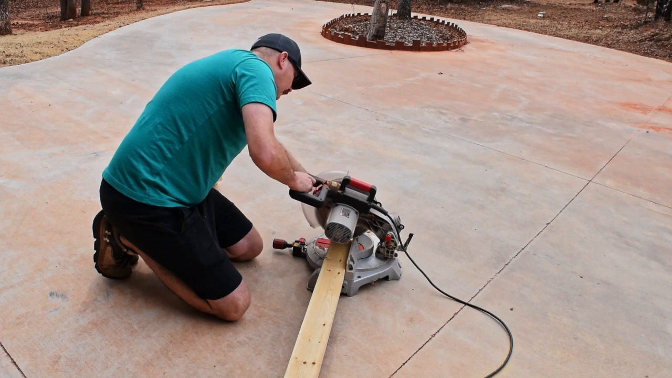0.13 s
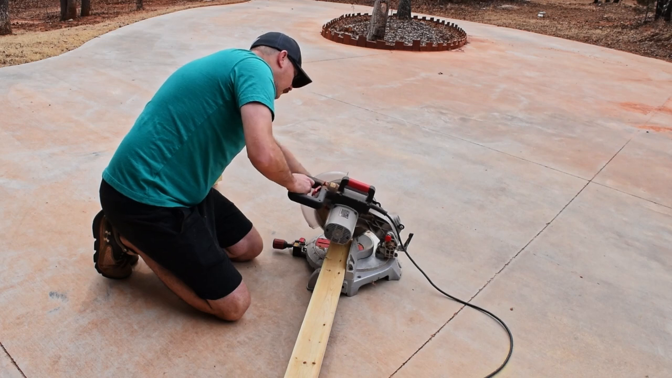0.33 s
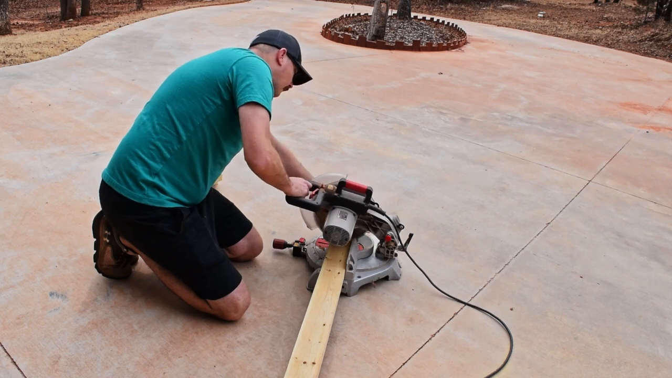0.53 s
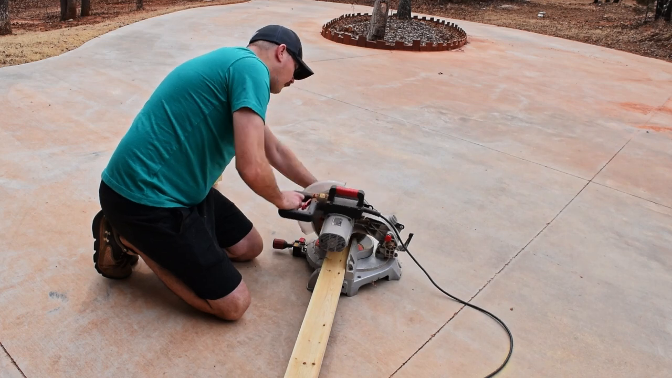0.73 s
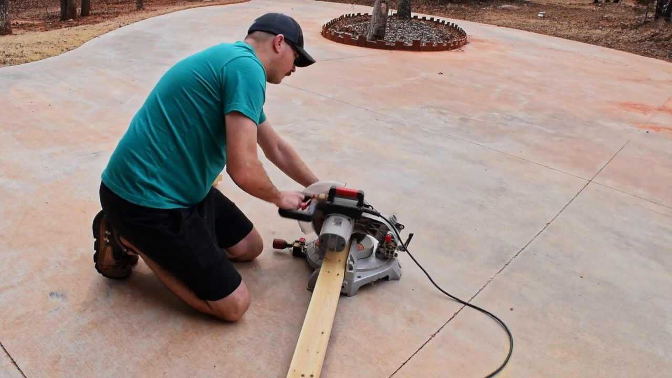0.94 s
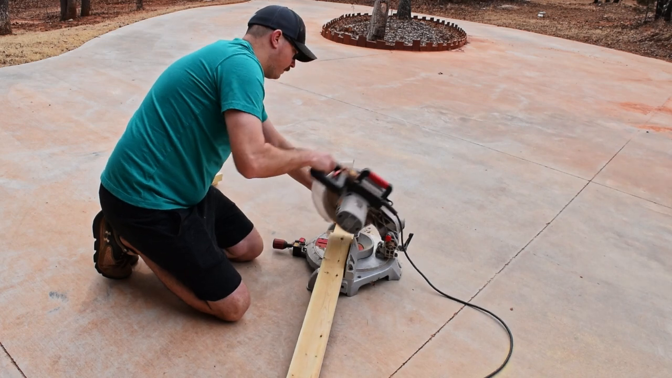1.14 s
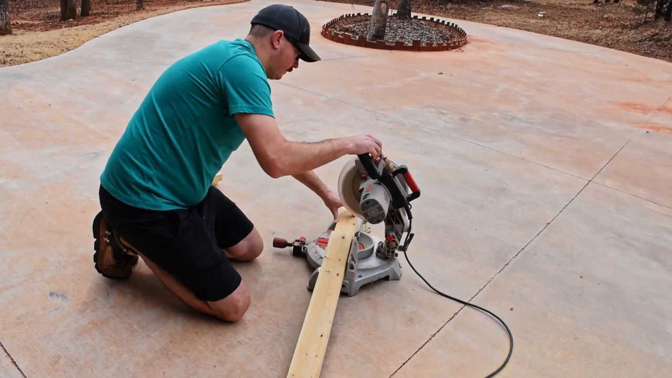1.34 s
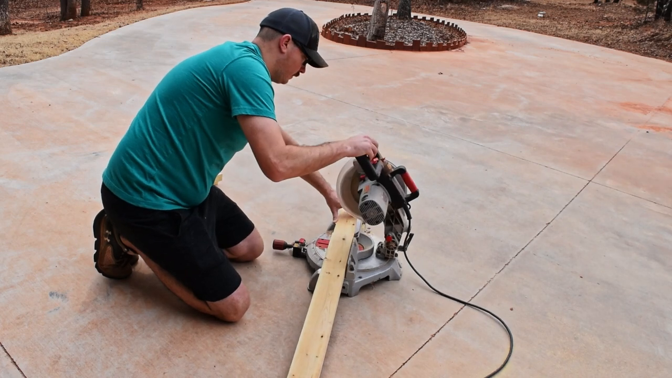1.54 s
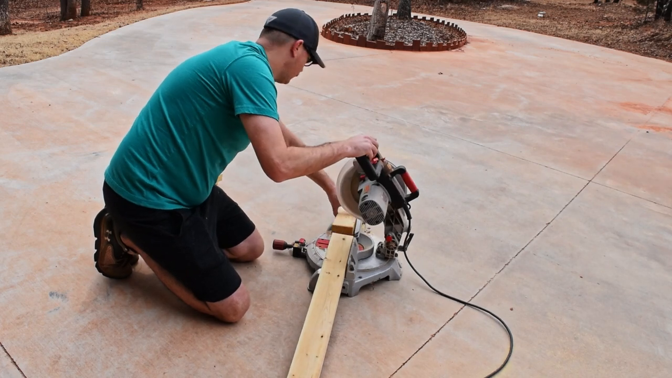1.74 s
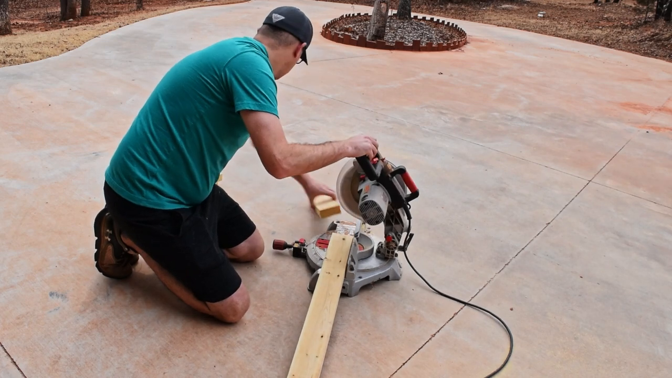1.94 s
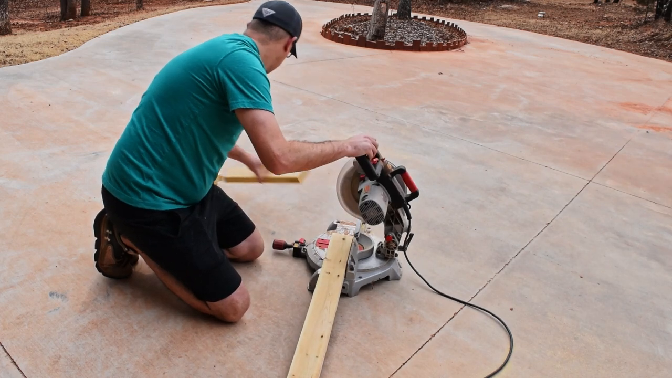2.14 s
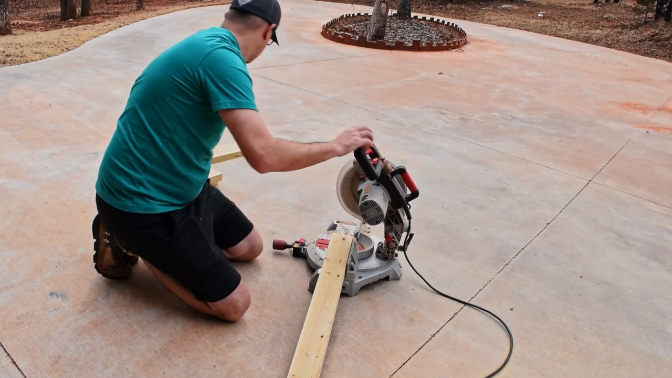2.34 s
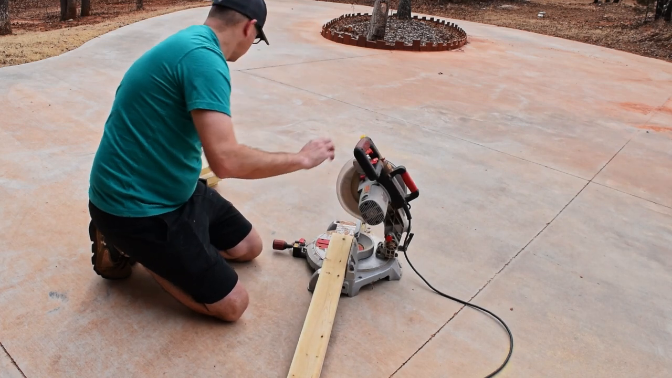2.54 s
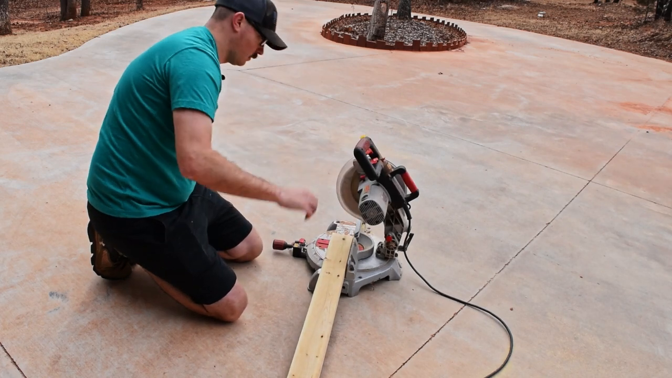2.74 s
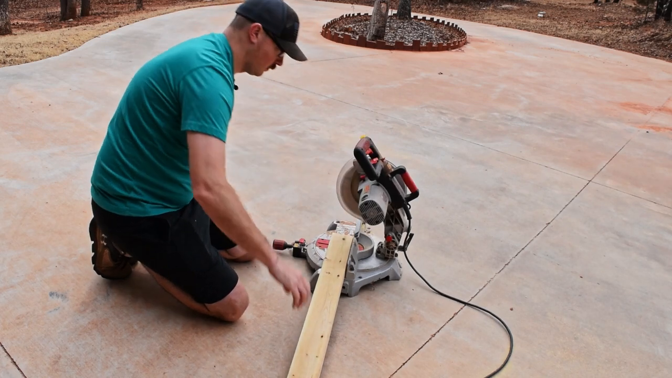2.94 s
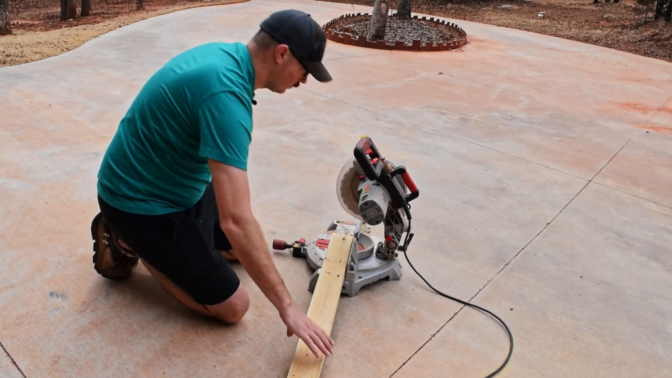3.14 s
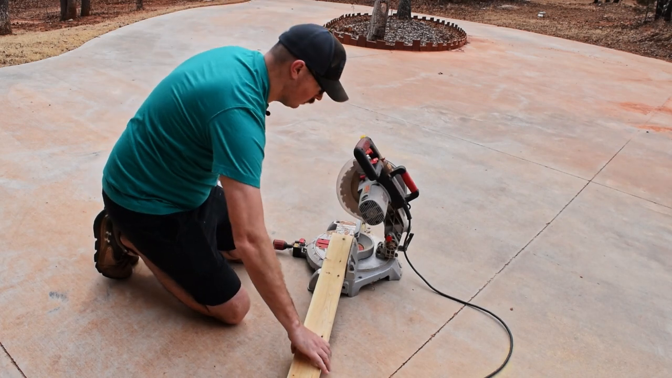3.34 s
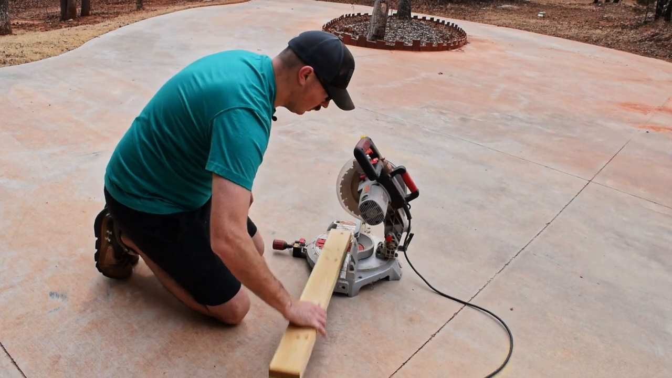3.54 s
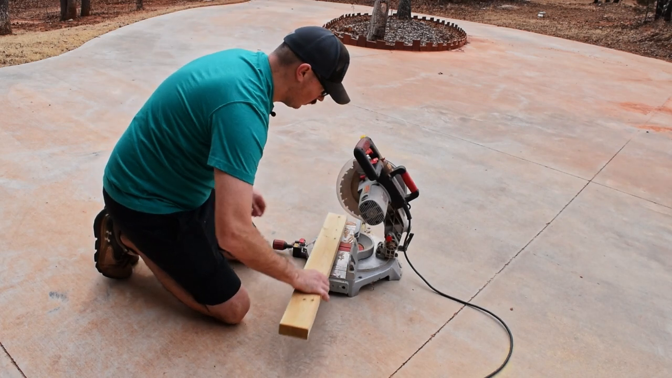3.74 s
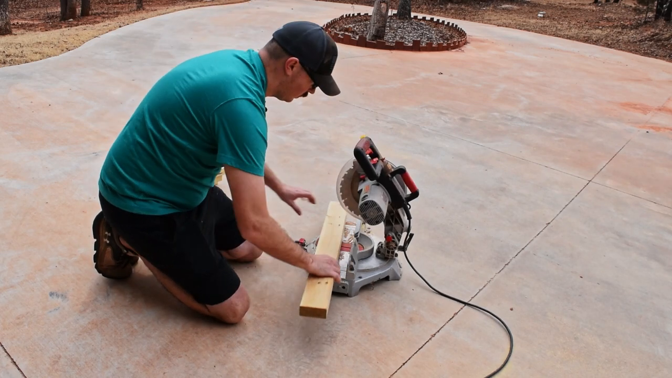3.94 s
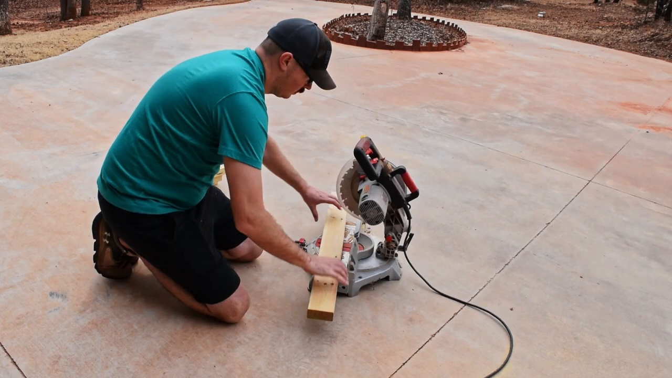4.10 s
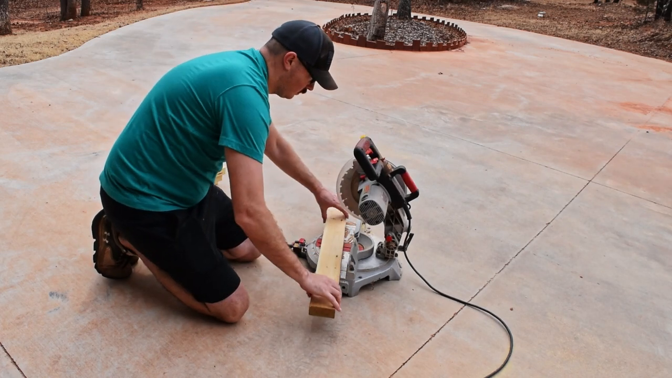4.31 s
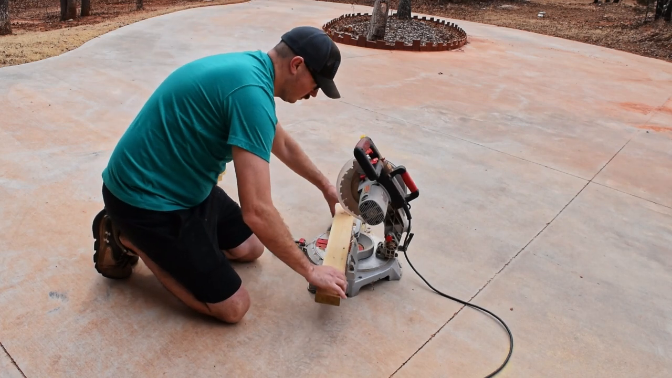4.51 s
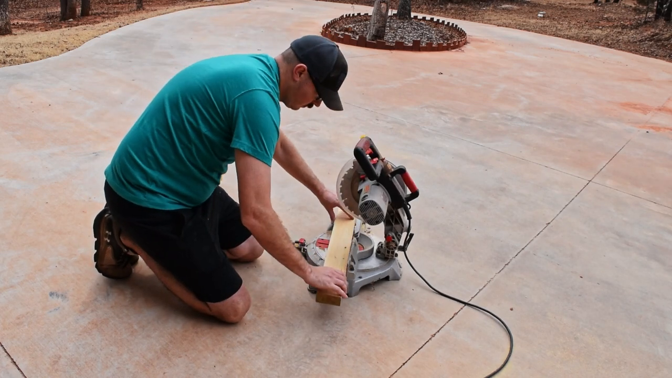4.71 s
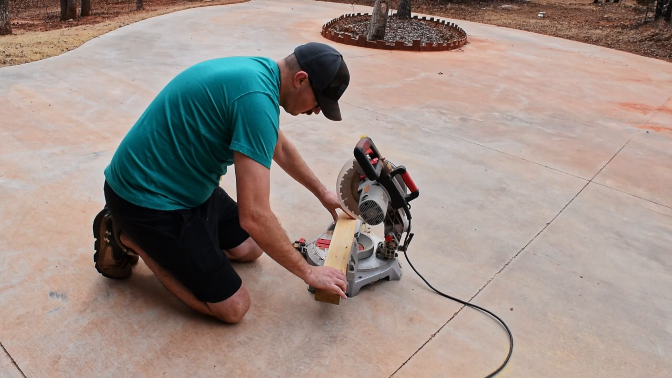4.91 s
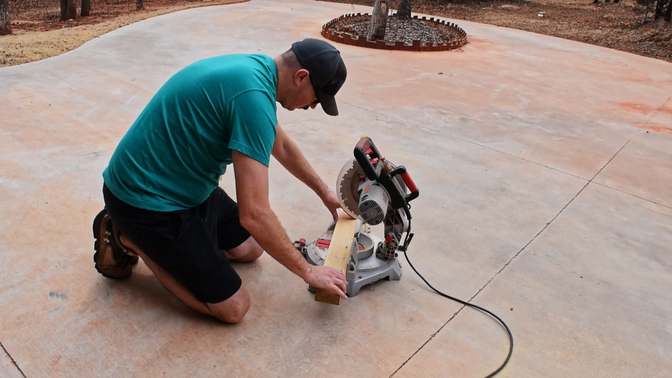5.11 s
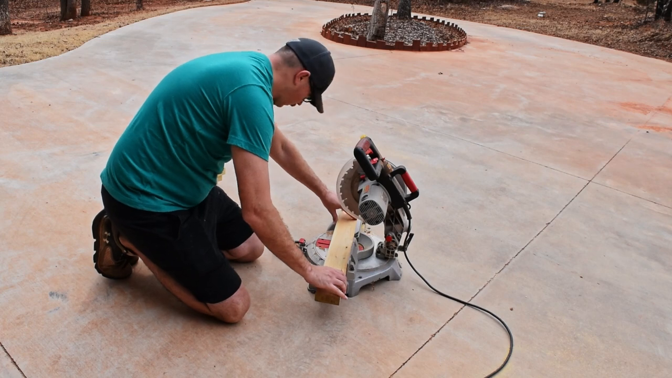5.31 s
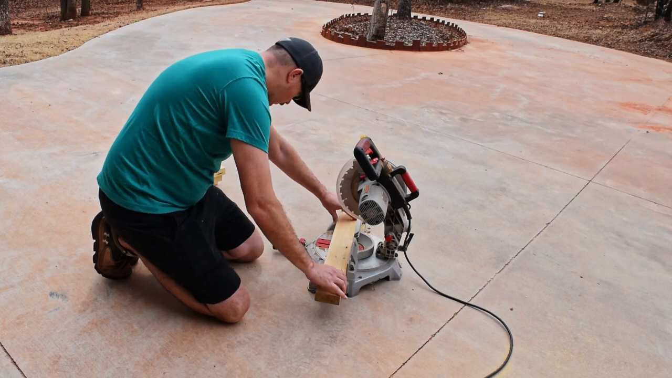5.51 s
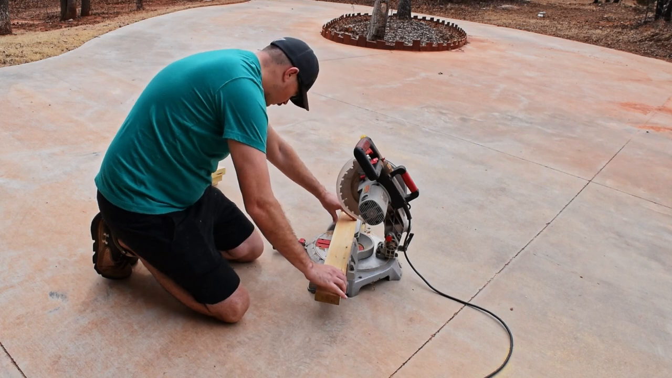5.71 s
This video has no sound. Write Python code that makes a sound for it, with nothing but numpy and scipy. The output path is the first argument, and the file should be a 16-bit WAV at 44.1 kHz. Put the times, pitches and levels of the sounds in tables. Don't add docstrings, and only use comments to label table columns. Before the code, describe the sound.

Close and fairly dry outdoors: a saw blade rips through wood under load, suddenly eases off, then slows in a descending whine while the raised head rattles. After a small wooden tap on the ground, only handling remains: scraping, a cluster of plank knocks, light nudges and faint rustle over low wind, cutting off abruptly near the end.

```python
import sys
import numpy as np
from scipy import signal
from scipy.fft import rfft, irfft, next_fast_len
from scipy.io import wavfile
from scipy.ndimage import uniform_filter1d, minimum_filter1d

SR = 44100
rng = np.random.default_rng(int(sys.argv[2]) if len(sys.argv) > 2 else 0)


def unload_audio(sound):
    columns = np.transpose(np.atleast_2d(sound))
    steps = np.round(np.clip(columns, -1, 1) * 32767)
    wavfile.write(sys.argv[1], SR, steps.astype(np.int16))


def invert_db(x):
    u = np.asarray(x, float) / 20
    return 10 ** u


N = 253948
TIME = np.arange(N) / SR

# frequency in Hz, level in dB, ring time t60 in seconds.
PLANK_MODES = [(262.3, -23.5, 0.12), (367, -3, 0.095), (431.5, -11.5, 0.15), (579.3, -8.5, 0.16),
               (635, 0, 0.038), (748.5, -3.5, 0.054), (1041, -13.5, 0.093), (1302, -19, 0.086),
               (1637, -17, 0.055)]

HANDOVER_S = 2.86
FREED = np.clip((TIME - .782) / 0.041, 0, 1)
OPENED = np.interp(TIME, [0.93, 1.46], [0, 1])
BRAKED_S = np.clip(TIME - .95, 0, None)

FREE_HZ, CREEP_HZ, SLOWS_PER_S = 4900, 295, 2.41
MOTOR_HZ = CREEP_HZ + (FREE_HZ - CREEP_HZ) * np.exp(-SLOWS_PER_S * BRAKED_S)
SPEED_DB = 20 * np.log10(MOTOR_HZ / FREE_HZ)


def unit(x):
    return x / np.sqrt(np.mean(x ** 2) + 1e-20)


def along(points, hz):
    f, v = np.transpose(points)
    return np.interp(np.log(hz + 1), np.log(f + 1), v)


def curves(rows):
    s, *cols = np.transpose(rows)
    return [np.interp(TIME, s, c) for c in cols]


def swells(rows, rise, fall, base_db):
    power = invert_db(2 * base_db)
    for s, db in rows:
        drop_db = np.where(TIME < s, rise * (s - TIME), fall * (TIME - s))
        power = power + invert_db(2 * (db - drop_db))
    return 10 * np.log10(power)


def arch(start, end):
    return np.sqrt(np.clip(1 - ((2 * TIME - start - end) / (end - start)) ** 2, 0, 1))


def wobble(rate):
    knots = rng.standard_normal(int(N * rate / SR) + 4)
    return 1.2 * np.interp(TIME * rate, np.arange(len(knots)), knots)


def filtered(x, response):
    m = next_fast_len(N + SR // 2)
    return irfft(rfft(x, m) * response(np.fft.rfftfreq(m, 1 / SR)), m)[..., :N]


def peaks(modes, f):
    total = 0
    for k, (centre, width, db) in enumerate(modes):
        resonance = 1j * f * width / (centre * centre - f * f + 1j * f * width)
        total = total + (-1) ** k * invert_db(db) * resonance
    return total


def grit(spiky_db, rate):
    return rng.standard_normal(N) * invert_db(spiky_db * wobble(rate))


def patches(patchy_db):
    z = signal.stft(rng.standard_normal(N), nperseg=512)[2]
    field = uniform_filter1d(rng.standard_normal(z.shape), size=12, axis=0)
    field = uniform_filter1d(field, size=10, axis=1)
    return signal.istft(z * invert_db(patchy_db * unit(field)), nperseg=512)[1][:N]


def whine(hz, smear):
    turn = 2 * np.pi * np.cumsum(hz * (1 + smear * wobble(900))) / SR
    return np.sqrt(2) * np.sin(turn) * invert_db(1.8 * wobble(25) - .4) * (hz < SR / 2)


def band(hz, width_hz):
    turn = 2 * np.pi * np.cumsum(hz) / SR
    return (wobble(width_hz) * np.sin(turn) + wobble(width_hz) * np.cos(turn)) * (hz < SR / 2)


def nearness(hz, best, reach):
    return np.exp(-(np.log2(hz / best) / reach) ** 2 / 2)


def saw():
    noise = housing_growl() + fan_air() + tooth_hiss()
    noise = filtered(noise, lambda f: invert_db(along([(100, -6), (200, 0)], f)))
    return (TIME < HANDOVER_S) * (noise + filtered(tooth_tones() + motor_tones(), blade))


def running_db(cut_db, per_bite_db, free_db, per_speed_db, fade_db_per_s, lift_db, lift):
    # time in seconds, feed pressure in dB.
    bite = [
        (0, -4.5),
        (.08, -1),
        (.3, -0.36),
        (.53, 0.7),
        (.67, 2.5),
        (.76, -1.5),
        (.8, -3.5),
    ]
    cutting = cut_db + per_bite_db * curves(bite)[0]
    spinning = free_db + per_speed_db * SPEED_DB - fade_db_per_s * BRAKED_S + lift_db * lift
    return (1 - FREED) * cutting + FREED * spinning


def blade(f):
    # frequency in Hz, width in Hz, level in dB over the hiss.
    plate_modes = [(4400, 160, -3.5), (4900, 26, 4), (5470, 7.6, 6.5), (6650, 62, 3), (7800, 30, 8),
                   (8550, 61, 9.5), (8900, 30, 5), (9500, 42, 8), (10430, 20, 5), (10000, 17, 3),
                   (10260, 12, 5.5), (11000, 30, -4.5), (12770, 27, 5), (13400, 30, -0.5)]
    return np.sqrt(1 + abs(peaks(plate_modes, f)) ** 2)


def housing_growl():
    # frequency in Hz, width in Hz, level in dB.
    casing_modes = [(219, 55, -16), (355, 120, -9), (438, 95, -4.5), (534, 58, -6.5), (709.5, 37, 0),
                    (743.2, 22, 1.5), (782, 84, -8), (1068, 180, -13.5), (1440, 220, -18.5)]
    # time in seconds, level in dB of the gear slap.
    gear_slaps = [(.82, 2), (.865, -0.5), (.94, 3), (1.345, 0.5), (1.385, 0), (1.435, -1), (1.47, -0.5),
                  (1.515, 1), (1.59, 3), (1.655, 6), (1.75, 2), (1.84, 3.5)]
    chatter_db = FREED * wobble(45) + swells(gear_slaps, rise=500, fall=599, base_db=-1)
    rattle = grit(0.24, 60) * invert_db(chatter_db)
    growl = filtered(rattle, lambda f: peaks(casing_modes, f) * (f ** 2 / (f ** 2 + 170 ** 2)) ** 2)
    raised = np.interp(TIME, [1.25, 1.357], [0, 1])
    return invert_db(running_db(-42, -1.5, -38, 1.79, -3.83, 13, raised)) * unit(growl)


def fan_air():
    # frequency in Hz, density in dB per Hz.
    vent_colour = [(710, -17), (1200, 2.5), (1650, -4), (1940, -1.5), (2490, -8.5), (2800, -14.5),
                   (3740, -11.5), (4800, -9), (6240, -33), (10600, -120)]
    air = unit(filtered(patches(2.2), lambda f: invert_db(along(vent_colour, f))))
    return invert_db(running_db(-46, 0.5, -48.5, 1.02, 3, 7.5, OPENED)) * air


def tooth_hiss():
    # frequency in Hz, density in dB per Hz, in the wood.
    chip_colour = [(2060, -16.5), (3500, -11), (5450, -6), (5810, -4), (6640, -3), (7250, -4.5), (8390, -5),
                   (10900, -0.5), (15400, -4.5), (15900, -14)]
    # frequency in Hz, density in dB per Hz, in the air.
    whirr_colour = [(2060, -35.5), (3500, 1), (6510, -1.5), (8550, -5), (9760, 0.5), (11400, -6.5),
                    (13700, -6), (15900, -21)]
    chips = unit(filtered(patches(1.2), lambda f: invert_db(along(chip_colour, f)) * blade(f)))
    whirr = unit(filtered(patches(2.3), lambda f: invert_db(along(whirr_colour, f)) * blade(f) ** 0.51))
    hiss = np.sqrt(1 - FREED) * chips + np.sqrt(FREED) * whirr
    return invert_db(running_db(-26.5, 0.88, -43, 0.08, 27.5, 10, OPENED) - 2.5) * hiss


def tooth_tones():
    # time in seconds, tooth rate in Hz, level in dB.
    tooth_rate = [
        (0, 1745, -55),
        (.12, 1715, -55),
        (.24, 1660, -54),
        (.33, 1600, -53),
        (.41, 1525, -52),
        (.5, 1430, -52),
        (.6, 1310, -56),
        (.7, 1190, -66),
        (.8, 1080, -75),
    ]
    # multiple of the tooth rate, level in dB, best frequency in Hz, reach in octaves.
    multiples = [(.8, 3, 1370, .1), (1, 4, 1420, .1), (1, 1, 1700, .07), (1.15, -6, 1950, .1),
                 (2, -1, 3400, .03), (2, 4, 3150, .05), (3, 5, 5020, .03), (3, 5, 4650, .03),
                 (3, 6, 4250, .04), (4, 1, 5800, .05), (5, -2, 8500, .1), (6, 13, 9050, .04),
                 (6, 9, 8600, .025), (6, 6, 9500, .025), (8, 8, 10600, .06), (8, 9, 12900, .03),
                 (9, 15, 14900, .05), (9, 13, 11200, .05), (10, 13, 14300, .06)]
    tooth_hz, tooth_db = curves(tooth_rate)
    tones = np.zeros(N)
    for k, db, best, reach in multiples:
        hz = k * tooth_hz
        tones += invert_db(db) * nearness(hz, best, reach) * whine(hz, smear=.002)
    return invert_db(tooth_db) * (1 - FREED) * tones


def motor_tones():
    # multiple of the commutator rate, level in dB, smear as a share,
    # best frequency in Hz, reach in octaves.
    windings = [(1, 6, .007, 3300, .16), (1, 0, .005, 2400, .14), (1, 4, .006, 1600, .07),
                (1.33, 0, .01, 4600, .1), (2, -3, .004, 4620, .04), (2, -5, .008, 4100, .04),
                (2, -8, .01, 2600, .15), (2.5, -8, .008, 3600, .08), (3, -6, .006, 4400, .07),
                (4, -2, .007, 4500, .06), (4, -2, .005, 3800, .08), (4, -7, .005, 3250, .06),
                (5.6, -2, .15, 13500, .08), (6, -1, .06, 13200, .07), (6, -4, .04, 11800, .04),
                (6, 8, .1, 9700, .09), (6, -3, .06, 8400, .1), (6, -4, .05, 10600, .05),
                (3, 0, .05, 12500, .08), (6, 0, .015, 7900, .04), (6, 0, .06, 6200, .12),
                (6, -1, .012, 5100, .025), (6, -5, .008, 4450, .05), (6, -2, .006, 3650, .08),
                (6, -5, .01, 3030, .045), (6, -6, .01, 2350, .05), (5, -8, .01, 4800, .15),
                (1.5, -9, .012, 3000, .12), (4, -8, .008, 2250, .12)]
    vents_open = np.interp(TIME, [1.19, 1.24], [0, 1])
    motor_db = -56 + 1.7 * SPEED_DB + 18 * vents_open
    tones = np.zeros(N)
    for k, db, smear, best, reach in windings:
        hz = k * MOTOR_HZ
        tone = band(hz, smear * best) if smear > .025 else whine(hz, smear)
        tones += invert_db(motor_db + db) * (BRAKED_S > 0) * nearness(hz, best, reach) * tone
    return tones


def thump():
    t = np.clip(TIME - .705, 0, None)
    hz, t60 = 30, .12
    return -invert_db(-49 - 60 * t / t60) * np.cos(2 * np.pi * hz * t) * (1 - np.exp(-t / .0015))


def knocks(events, modes, clatter, tilt, gain_db=0, soft_s=0):
    out, t = np.zeros(N + SR), np.arange(SR // 3) / SR
    middle = signal.butter(2, [800, 3800], "bandpass", fs=SR)
    top = signal.butter(1, [4000, 9000], "bandpass", fs=SR)
    for s, db, crack_db, stretch in events:
        rise_s = .0005 + soft_s * (db < -20)
        clatter_db = clatter[0] + clatter[1] * crack_db
        bright = tilt[0] + tilt[1] * (db + 30)
        luck, dust = rng.standard_normal((len(modes), 2)), rng.standard_normal((2, len(t)))
        ring = 0
        for (hz, level, t60), (a, b) in zip(modes, luck):
            decay_db = 60 * t / (t60 * max(stretch, .1))
            size = invert_db(level + 1.8 * a + bright * np.log2(hz / 700) - decay_db)
            ring = ring + size * np.sin(2 * np.pi * hz * (1 + 0.0051 * b) * t)
        burst = signal.lfilter(*middle, dust[0]) * invert_db(clatter_db + 8.0 - 60 * t / 0.052)
        crack_decay_db = 60 * t / (0.044 * max(stretch, .3))
        crack = signal.lfilter(*top, dust[1]) * invert_db(crack_db + 5.0 - crack_decay_db)
        hit = (ring + burst) * (1 - np.exp(-t / rise_s)) + crack * (1 - np.exp(-t / .002))
        out[round(s * SR):][:len(t)] += invert_db(db + gain_db) * hit
    return filtered(out[:N], lambda f: (1j * f / (150 + 1j * f)) ** 2)


def offcut():
    # time in seconds, peak in dB, crack in dB, ring stretch as a factor.
    hits = [
        (.889, -16.5, -30, .75),
        (1.0185, -18.5, -29, .95),
    ]
    # frequency in Hz, level in dB, ring time t60 in seconds.
    bar_modes = [(571, -12, .15), (700, -14, .04), (930, -5, .02), (1052, -2, .13), (1290, -6, .06),
                 (1420, -4, .02), (1645, -2, .075)]
    return knocks(hits, bar_modes, clatter=(0, .4), tilt=(-20, 1.6))


def head_rattle():
    # time in seconds, peak in dB, crack in dB, ring stretch as a factor.
    hits = [
        (1.253, -37.5, 11.5, 0.77),
        (1.336, -24, -24, 0.42),
        (1.389, -22.5, -41, 0.46),
        (1.43, -27.5, -43, 0.84),
        (2.585, -32.5, -53, 0.63),
    ]
    return knocks(hits, PLANK_MODES, clatter=(0, .4), tilt=(.5, .01), gain_db=-6, soft_s=.001)


def offcut_on_ground():
    # time in seconds, peak in dB, crack in dB, ring stretch as a factor.
    hits = [
        (2.643, -26.5, -44, 1.2),
        (2.672, -41, -56, .7),
    ]
    # frequency in Hz, level in dB, ring time t60 in seconds.
    landed_modes = [(450, -18, .05), (700, -11, .1), (883, 0, .087), (1250, -8, .02), (1394, -10, .05),
                    (1550, -8, .02), (1717, -11, .035), (1950, -8, .015), (2300, -8, .015),
                    (2778, -5, .028), (3833, -14, .03)]
    return knocks(hits, landed_modes, clatter=(12, .7), tilt=(-2.2, .55))


def plank():
    # time in seconds, peak in dB, crack in dB, ring stretch as a factor.
    hits = [(3.535, -24.5, -22, 0.85), (3.549, -43, 0, 0.1), (3.677, -39.5, -44, 1.1),
            (3.839, -45, -20, 1.15), (3.874, -57.5, 1, 1.1), (3.974, -40, -11, 0.89),
            (4.069, -35.5, -22, 0.63), (4.089, -12.5, -29.5, 0.91), (4.129, -26.5, -31, 0.67),
            (4.181, -21.5, -39, 1.13), (4.199, -21, -13.5, 0.55), (4.208, -23.5, -37, 0.91),
            (4.274, -27.5, -35, 2.03), (4.324, -27, -40, 1.05), (4.344, -31, -27, 1.3),
            (4.409, -53, -18, 10), (4.553, -41, -34, 0.75), (4.577, -30, -39, 1.1),
            (4.609, -38.5, -33, 0.63), (4.883, -37, -39, 0.9), (4.899, -42.5, -55, 0.99),
            (4.994, -55.5, -5, 0.45), (5.267, -52, -3.5, 0.5), (5.471, -59, -17, 0.62),
            (5.497, -61, -14, 0.54), (3.658, -44.5, -20, 0.54), (3.92, -49, -40, 0.88),
            (3.962, -46, -44, 0.74), (4.15, -32.5, -45, 1.1), (4.165, -41, -30, 0.53)]
    return knocks(hits, PLANK_MODES, clatter=(-10, .4), tilt=(-2.2, .18), gain_db=-6, soft_s=.0012)


def handling():
    # time in seconds, level in dB where the plank rubs hardest.
    strokes = [
        (2.94, -64.5),
        (3.59, -55),
        (3.9, -56.5),
        (4.02, -62),
        (4.172, -44),
        (4.34, -53),
        (4.59, -62.5),
        (4.83, -67.5),
        (5.37, -99),
    ]
    # time in seconds, level in dB of the coasting saw's murmur that fades from there.
    fading_murmur = [
        (3.1, -68),
    ]
    # start in seconds, end in seconds, level in dB.
    sleeve_moves = [(2.849, 3.51, -90.5), (3.266, 3.368, -90), (3.44, 3.544, -81), (3.527, 3.61, -69.5),
                    (3.592, 3.747, -74.5), (3.806, 4.098, -80.5), (4.09, 4.123, -62.5), (4.194, 4.228, -65),
                    (4.257, 4.375, -83), (4.36, 4.638, -78), (4.64, 4.717, -90), (4.704, 4.795, -78),
                    (4.782, 4.9, -83), (4.9, 5.33, -99), (2.89, 2.972, -84.5)]
    # frequency in Hz, width in Hz, level in dB.
    wood_modes = [(243, 89, -6.5), (374, 86, 3), (462, 84, 3), (591, 86, -6), (716, 43, 2), (932, 54, -8)]
    # frequency in Hz, density in dB per Hz, of the table.
    table_colour = [(470, -26), (800, -9.5), (1080, 2.5), (1290, -6), (1400, -3.5), (1450, -3),
                    (2110, -17.5), (3200, -31.5), (4160, -55.5), (7040, -120)]
    # frequency in Hz, density in dB per Hz, of cloth and dust.
    rustle_colour = [(1290, -23), (2200, -3.5), (2800, -14), (3090, -4), (3770, 0), (4090, -3), (5600, -6),
                     (6290, -8), (10200, -10.5), (14800, -16.5), (15900, -21)]
    rest_db = -73
    wood_db = swells(fading_murmur, rise=1, fall=33, base_db=rest_db - 3.5 * (TIME - 3))
    wood_db = swells(strokes, rise=151, fall=109.5, base_db=wood_db)
    table_db = -80 + 0.88 * (wood_db - rest_db)
    cloth = invert_db(-94)
    for start, end, db in sleeve_moves:
        cloth = cloth + invert_db(db) * arch(start, end)
    wood = unit(filtered(grit(1.6, 70), lambda f: peaks(wood_modes, f)))
    table = unit(filtered(patches(2.6), lambda f: invert_db(along(table_colour, f))))
    rustle = unit(filtered(patches(2.2), lambda f: invert_db(along(rustle_colour, f))))
    rubbing = invert_db(wood_db + 1.5) * wood + invert_db(table_db + 2.0) * table
    return (TIME >= HANDOVER_S) * (rubbing + invert_db(1.5 + 2.2 * wobble(60)) * cloth * rustle)


def singing():
    # start in seconds, end in seconds, frequency in Hz, width in
    # Hz, level in dB.
    singing_parts = [(-.3, .2, 5485, 9, -45), (-.3, .3, 5500, 30, -47), (.17, .4, 5450, 9, -47),
                     (2.96, 3.46, 1361, 8, -73), (2.9, 3.08, 1250, 500, -71), (1.22, 1.36, 13700, 1600, -55),
                     (1.42, 1.51, 9700, 600, -48), (1.05, 1.8, 9600, 450, -60), (1.3, 2.25, 9600, 350, -73),
                     (2, 2.6, 9600, 350, -80), (1.3, 1.65, 7900, 120, -64), (1.6, 2.9, 7900, 900, -78),
                     (1.1, 1.9, 13000, 1200, -69), (1.4, 2.4, 13200, 900, -82), (1.7, 2.5, 5200, 1500, -72),
                     (2.3, 2.9, 6800, 1500, -80), (2.3, 2.85, 1900, 500, -72), (.72, 1.0, 571, 30, -48),
                     (3.05, 3.3, 560, 150, -70), (1.72, 2.3, 390, 130, -59), (-.1, .28, 5000, 15, -48),
                     (.66, .84, 4830, 9, -51), (.58, .74, 14200, 25, -50), (-.1, .22, 13550, 25, -46),
                     (-.1, .3, 11900, 40, -48), (-.1, .3, 8500, 60, -50), (.2, .5, 12800, 40, -47),
                     (.54, .68, 10600, 300, -42), (.52, .62, 9600, 60, -46), (.54, .74, 6600, 120, -46),
                     (3.64, 3.74, 210, 60, -61), (4.4, 4.5, 1050, 30, -69), (3.0, 3.42, 2570, 7.1, -90),
                    (3.3, 3.62, 4500, 300, -87), (3.62, 3.75, 4600, 300, -84), (3.54, 3.61, 3200, 60, -76),
                    (3.89, 4.07, 2300, 80, -76), (3.9, 4.0, 480, 160, -55), (3.9, 4.02, 1600, 400, -68),
                    (4.07, 4.17, 578, 9, -41), (4.15, 4.24, 560, 40, -46), (4.39, 4.5, 3780, 200, -78),
                    (4.47, 4.576, 3150, 60, -83), (4.47, 4.56, 5500, 400, -81),
                    (4.7, 4.79, 7000, 3000, -80), (4.906, 5.45, 1361, 4.4, -94.5)]
    out, rubbing = np.zeros(N), invert_db(2.5 * wobble(30))
    for start, end, hz, width, db in singing_parts:
        span = slice(max(round(start * SR), 0), round(end * SR))
        if width > 10:
            resonance = signal.iirpeak(hz, hz / width, fs=SR)
            rough = rng.standard_normal(span.stop - span.start + SR // 4)
            rough = signal.lfilter(*resonance, signal.lfilter(*resonance, rough))
            voice = unit(rough[SR // 4:]) * rubbing[span]
        else:
            voice = whine(np.full(N, hz), smear=.001)[span]
        out[span] += invert_db(db) * arch(start, end)[span] * voice
    return out


def yard(x):
    # frequency in Hz, decay time t60 in seconds.
    decay = [(200, .22), (1000, 0.099), (4000, 0.23), (12000, .07)]
    hz, t, z = signal.stft(rng.standard_normal((2, SR // 3)), SR, nperseg=256)
    tail = signal.istft(z * invert_db(-60 * t / along(decay, hz)[:, None]), SR, nperseg=256)[1]
    wet = signal.fftconvolve(x[None], tail / np.linalg.norm(tail[0]), axes=1)[:, :N]
    colour = [(300, -8), (2500, -7), (5000, -2), (10000, 3)]  # Hz, dB
    return filtered(wet, lambda f: invert_db(along(colour, f)))


def wind():
    # time in seconds, level in dB.
    gusts = [(.4, -72), (.57, -65), (.72, -63), (.9, -72), (1.03, -65), (1.22, -71), (1.45, -73),
             (1.62, -72), (1.8, -70), (2.36, -61), (2.6, -64), (2.97, -69.5), (3.2, -73), (3.42, -73.5),
             (3.6, -68.5), (3.76, -66.5), (3.9, -66), (4.05, -60.5), (4.41, -65), (4.63, -66.5),
             (4.87, -64), (5.02, -67), (4.75, -73.5), (5.15, -65), (5.25, -66.5), (5.34, -68), (5.43, -71),
             (5.49, -70)]
    # frequency in Hz, density in dB per Hz.
    rumble_colour = [(12, -38), (20, -6.5), (55, -2.5), (100, -4), (205, -16), (236, -18), (260, -12.5),
                     (340, -54), (570, -120)]
    shared, own = grit(0, 20), .85 * np.array([grit(0, 20), grit(0, 20)])
    rumble = unit(filtered(shared + own, lambda f: invert_db(along(rumble_colour, f))))
    gust_db = swells(gusts, rise=169.5, fall=133.5, base_db=-82.5)
    return invert_db(gust_db + 3.1 * wobble(16)) * rumble


def scene():
    hits = offcut() + head_rattle() + offcut_on_ground() + plank()
    near = saw() + handling() + singing() + hits
    return near + invert_db(-15.5) * yard(near) + wind() + thump()


def limited(x):
    low = filtered(x, lambda f: 1 / (1 + (f / 3000) ** 4))
    x = x - low + low / (1 + abs(low / invert_db(-25.5)) ** 8) ** (1 / 8)
    ceiling, hardness = invert_db(-22.5), 7
    cut = x - x / (1 + abs(x / ceiling) ** hardness) ** (1 / hardness)
    return x - filtered(cut, lambda f: f ** 2 / (f ** 2 + 200 ** 2))


def gate_gain(x):
    # starts closing, shut, reopens and open, all in seconds, then how far it shuts from 0 to 1.
    closings = [
        (2.285, 2.3, 2.302, 2.315, .3),
        (2.805, 2.838, 2.866, 2.925, 1),
        (3.745, 3.787, 3.806, 3.826, 1),
        (5.45, 5.595, 5.752, 5.756, 1),
    ]
    size = abs(filtered(x.mean(0), lambda f: f / (f + 200)))
    crest = -minimum_filter1d(-size, size=14)
    usual = uniform_filter1d(size, size=2000)
    shut = sum(np.interp(TIME, times, [0, far, far, 0]) for *times, far in closings)
    passed = crest > usual * (shut > 0) * (1.45 + 1.1 * shut + 50 * (shut >= 1))
    return uniform_filter1d(np.where(passed, 1, invert_db(-36 * np.sqrt(shut))), size=20)


def roll_off(x):
    return signal.sosfilt(signal.butter(12, 16810, fs=SR, output="sos"), x)


def record(dry):
    # time in seconds, left minus right in dB.
    balance_db = [
        (0, -.3),
        (.68, -.3),
        (.85, -2.3),
        (1.4, -3.1),
        (5.76, -3.1),
    ]
    x = limited(dry)
    balance = curves(balance_db)[0] / 2
    gain = gate_gain(x) * invert_db(np.array([balance, -balance]))
    hush = invert_db(-92.5) * rng.standard_normal(x.shape)
    mix = filtered(x * gain + hush, lambda f: np.clip((15800 - f) / 150, 0, 1))
    return roll_off(mix)


dry = scene()
out = record(dry)
unload_audio(out)
```